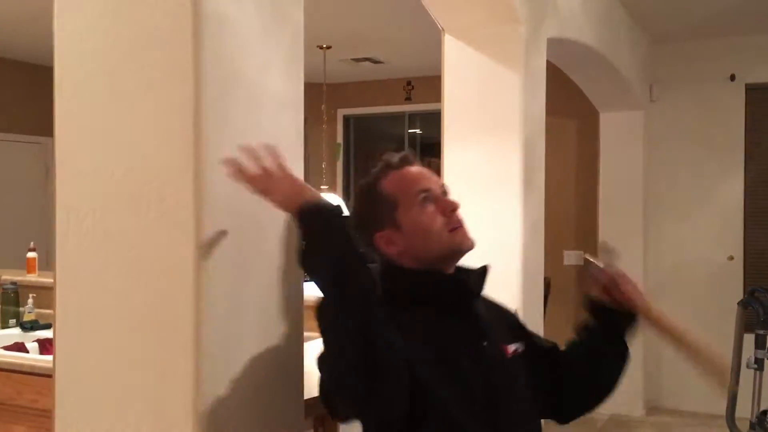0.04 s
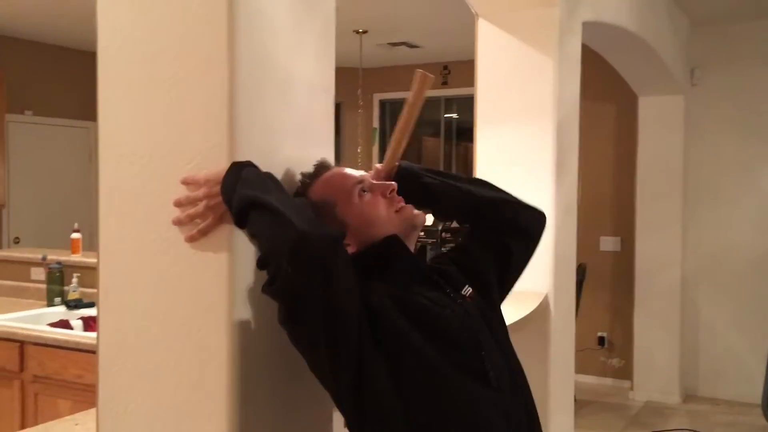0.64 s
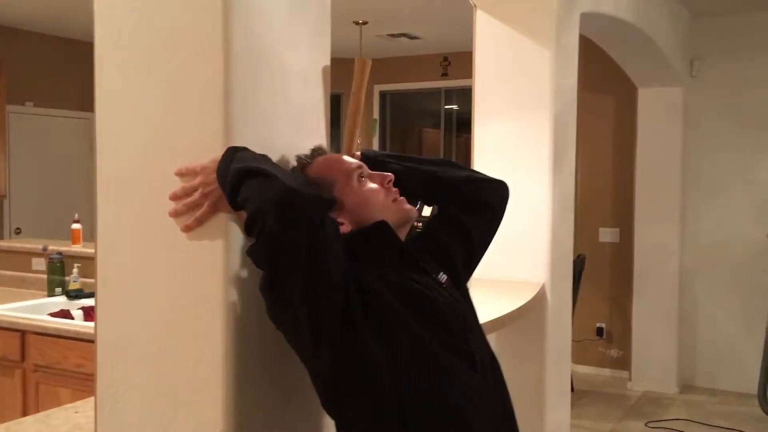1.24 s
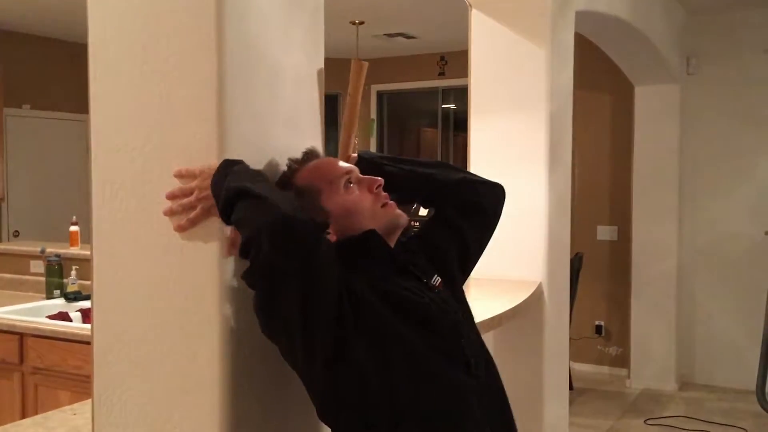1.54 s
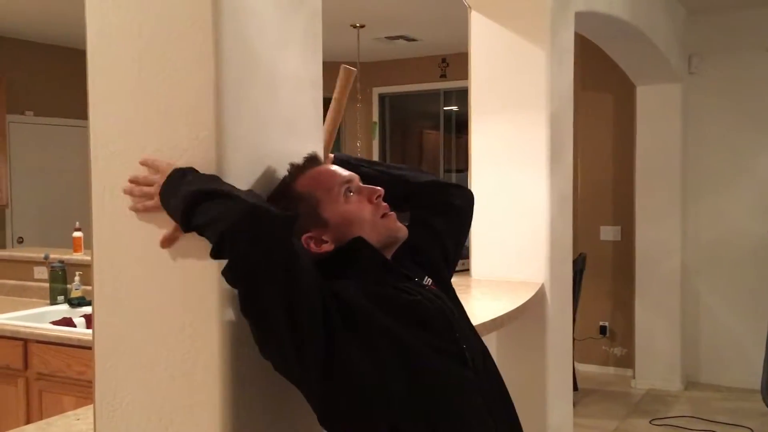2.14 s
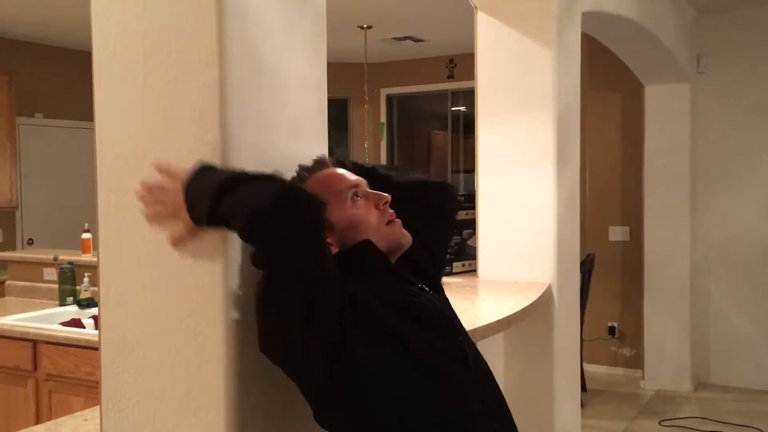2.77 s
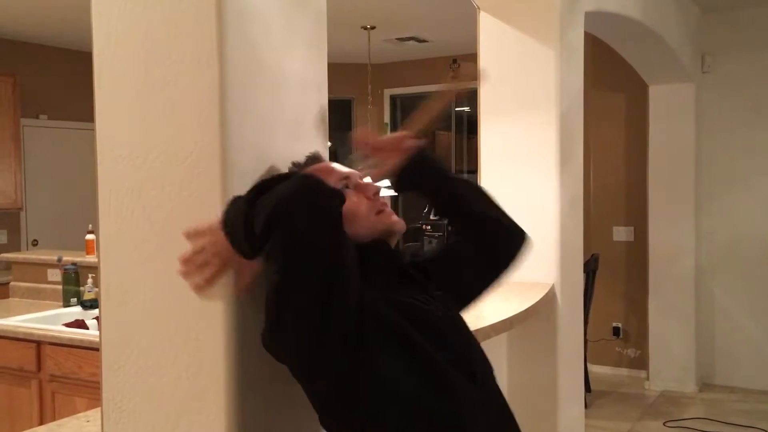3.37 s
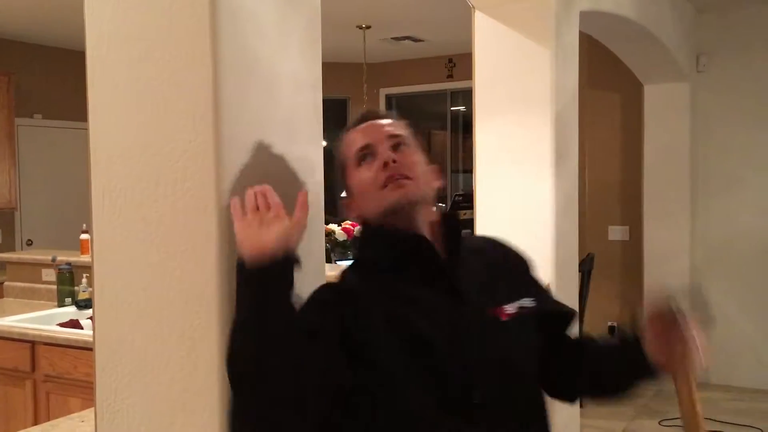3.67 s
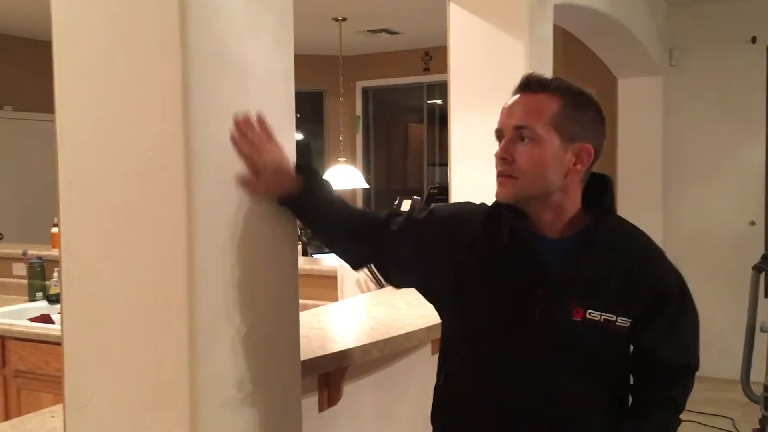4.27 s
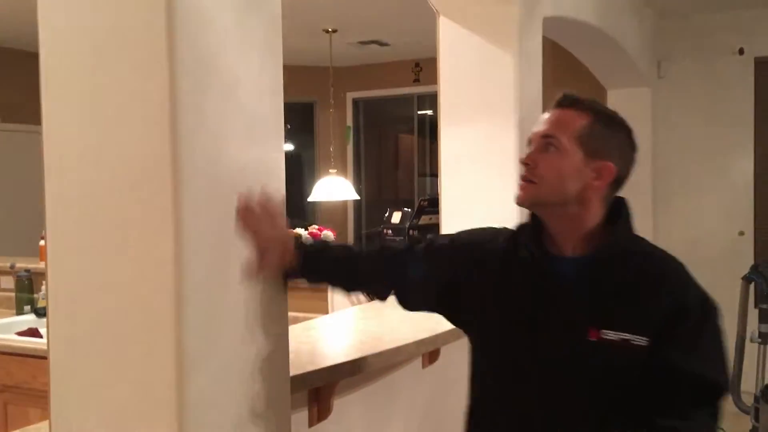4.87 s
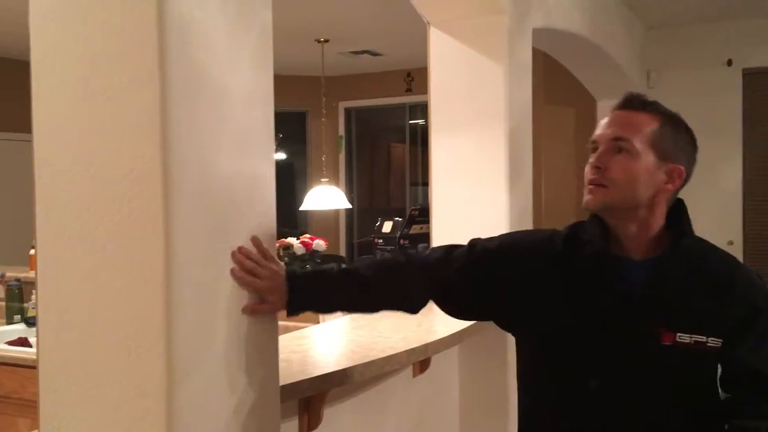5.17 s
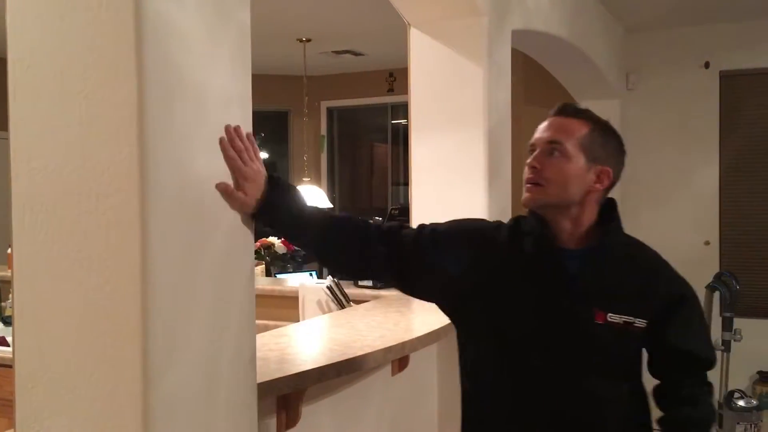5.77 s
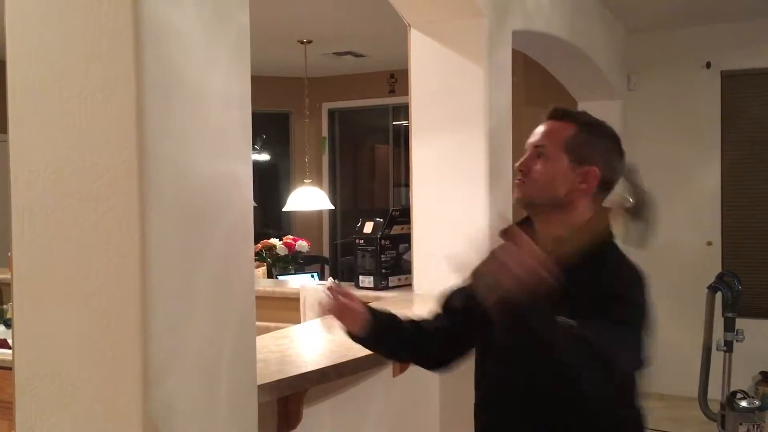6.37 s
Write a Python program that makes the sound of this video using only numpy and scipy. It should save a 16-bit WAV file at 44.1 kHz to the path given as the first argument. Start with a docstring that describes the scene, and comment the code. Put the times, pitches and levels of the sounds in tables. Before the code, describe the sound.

A bare hand slaps a hollow drywall pillar several times, then rubs along it in hissing strokes, over a faint room hum.

```python
"""Slapping and rubbing a hollow pillar

A bare hand slaps a drywall pillar in a hard-floored room, then rubs along it in strokes.
Each slap is a palm-and-fingers smack, a pop of trapped air and a thump that sets the boards ringing.
The sliding skin hisses, rasps and catches. A jacket sleeve rustles; an appliance hums behind it all."""
import sys
import numpy as np
from scipy import signal
from scipy.fft import rfft, irfft, next_fast_len
from scipy.io import wavfile
from scipy.ndimage import map_coordinates

SR = 44100
rng = np.random.default_rng(int(sys.argv[2]) if len(sys.argv) > 2 else 0)


def dump_mix(stems):
    """Bounce the given channels to the path in sys.argv[1] as a 16-bit WAV at rate SR."""
    frames = np.atleast_2d(stems).T  # one column per channel
    limited = np.clip(frames, -1, 1)  # hard clip at full scale
    pcm = np.round(limited * 32767).astype(np.int16)
    wavfile.write(sys.argv[1], SR, pcm)


N = 283122
TIME = np.arange(N) / SR
AGE = TIME[:SR]  # seconds into a transient

# Modes of the boards and the cavity behind them. Each row: frequency in Hz, relative dB, t60 in seconds.
BOARDS = [(67.2, -18, 2.7), (82, -3.5, 1.7), (99.3, -14, 1.7), (133.7, 0, 0.75), (146.1, 4, 0.79),
          (156.1, -3, 0.55), (182, -5.5, 0.99), (205, -4.5, 0.41), (235.2, -3.5, 0.62), (259.4, -3, 0.52),
          (280, -17.5, 1), (310.6, -11, 0.77), (335, -6.5, 0.83), (390, -6, 0.46), (476, -17, 0.28),
          (575.4, -9, 0.28), (571.5, -6, 0.37), (686, -6, 0.37), (737, -1, 0.12), (1038, -27, 0.49),
          (1047, -15, 0.4), (1200, -16, 0.56), (1314, -11, 0.37)]


def amp(db):
    """Decibels to gain."""
    return 10 ** (np.asarray(db) / 20)


def blow(x):
    """Scale a transient to the energy of 10 ms at rms 1."""
    return x * np.sqrt(.01 * SR / (np.sum(x ** 2) + 1e-20))


def fade(t60_s):
    """One second of exponential decay."""
    return np.exp(-np.log(1000) * AGE / t60_s)


def along(points, hz):
    """(Hz, value) points read on a log axis."""
    knots_hz, values = np.transpose(points)
    return np.interp(np.log(hz + 1), np.log(knots_hz + 1), values)


def wobble(rate_hz):
    """Smooth random curve, rate_hz knots a second."""
    return map_coordinates(rng.standard_normal(int(N * rate_hz / SR) + 4), [TIME * rate_hz])


def filtered(x, gain):
    """Apply gain(hz) with zero phase."""
    size = next_fast_len(len(x) + SR // 2)
    return irfft(rfft(x, size) * gain(np.fft.rfftfreq(size, 1 / SR)), size)[:len(x)]


def noise(spectrum):
    """Coloured noise of rms 1."""
    x = filtered(rng.standard_normal(N), lambda hz: amp(along(spectrum, hz)))
    return x / np.sqrt(np.mean(x ** 2) + 1e-20)


def coloured(x, spectrum):
    """Minimum-phase colouring of a one-second transient by (Hz, dB) points."""
    cepstrum = irfft(np.log(amp(along(spectrum, np.fft.rfftfreq(SR, 1 / SR)))))
    cepstrum[1:SR // 2] *= 2
    cepstrum[SR // 2 + 1:] = 0
    return irfft(rfft(x) * np.exp(rfft(cepstrum)))


def ping(hz, t60_s, attack_s):
    """Damped resonance with a soft start."""
    return np.sin(2 * np.pi * hz * AGE) * fade(t60_s) * (1 - np.exp(-AGE / attack_s))


def lingering(power, t60_s):
    """Gain of a sound fed with this power and dying away over t60_s."""
    pole = np.exp(-2 * np.log(1000) / (t60_s * SR))
    return np.sqrt(signal.lfilter([1 - pole], [1, -pole], power))


def add(out, start_s, x):
    """Mix x in at start_s."""
    part = out[round(start_s * SR):][:len(x)]
    part += x[:len(part)]


def room(x, near_gain=0.79, far_s=0.021, early_boost=0.92, early_t60_s=0.062):
    """Reflections off near surfaces, then far walls; a strong early part gives way to a long tail."""
    # Room decay. Each row: frequency in Hz, t60 in seconds.
    decay = [(80, 0.96), (210, 0.79), (560, 0.59), (1470, 0.71), (3800, 0.58), (7000, 0.59), (14000, 0.19)]
    # What the surfaces send back. Each row: frequency in Hz, gain in dB.
    walls = [(60, -1.5), (300, -2.5), (560, -2), (850, -6.5), (1200, -5.5), (2000, -2), (3000, 0.5),
             (4500, -6), (7000, -2), (15000, 5.5)]
    hz, frame_s, bins = signal.stft(rng.standard_normal(SR), SR, nperseg=256)
    bins = bins * np.exp(-np.log(1000) * frame_s / along(decay, hz)[:, None])
    tail = signal.istft(bins, SR, nperseg=256)[1][:SR]
    tail *= np.where(AGE > far_s, 1, near_gain) * (AGE > .005)
    tail *= 1 + early_boost * fade(early_t60_s)
    return signal.fftconvolve(x, coloured(tail / np.linalg.norm(tail), walls))[:SR]


def appliance_hum():
    """Low tones, slightly unsteady in level and phase."""
    # Hum partials. Each row: frequency in Hz, rms level in dB.
    partials = [(59.2, -54), (119.5, -58.5), (398.4, -76), (597.8, -63.5)]
    out = np.zeros(N)
    for hz, db in partials:
        peak = np.sqrt(2) * amp(db + 0.13 * wobble(4.5))
        out += peak * np.sin(2 * np.pi * hz * TIME + 0.057 * wobble(5.7))
    return out


def room_air():
    """Low, steady rush of air."""
    # Air spectrum. Each row: frequency in Hz, relative density in dB.
    spectrum = [(20, -48), (35, -7.5), (58, 7.5), (85, -10), (125, -6), (190, -10), (280, -18.5),
                (450, -28), (900, -32), (1650, -41), (2300, -85), (6000, -63), (16000, -57)]
    return amp(-51) * noise(spectrum)


def sleeve(hiss_gain, drag_db=-13.5, rest_db=-66.5):
    """Cloth brushes unevenly on cloth, swelling with each arm swing and dragging along with the palm."""
    # Arm swings. Each row: middle in seconds, width in seconds, level in dB.
    swings = [(0.2, 0.48, -56.5), (0.328, 0.098, -48), (1.004, 0.38, -55.5), (2.925, 0.38, -47),
              (3.553, 0.4, -58), (4.314, 0.68, -55.5), (5.157, 0.19, -55.5), (6.01, 0.25, -53.5),
              (6.264, 0.35, -51.5)]
    # Cloth spectrum. Each row: frequency in Hz, relative density in dB.
    cloth = [(200, 5.5), (700, -1.5), (1100, 1), (1650, 3), (2500, -2.5), (4000, -7), (6000, -10),
             (16000, -16)]
    swing_power = sum((amp(db) * np.exp(-2 * ((TIME - middle_s) / width_s) ** 2)) ** 2
                      for middle_s, width_s, db in swings)
    gain = np.sqrt(swing_power + (amp(drag_db) * hiss_gain) ** 2 + amp(rest_db) ** 2)
    return gain * noise(cloth) * amp(-2.5 + 0.75 * wobble(35) + 1.6 * wobble(300))


def ticks():
    """Light, hard touches that ring briefly."""
    # Touches. Each row: start in seconds, level in dB, pitch in Hz.
    touches = [(0.131, -63, 1740), (6.108, -46.5, 2560), (6.122, -50.5, 1940)]
    # Tick partials. Each row: multiple of the pitch, relative level in dB.
    partials = [(.6, -11), (1, -1), (1.42, -6), (1.75, -8)]
    out = np.zeros(N)
    for start_s, level_db, hz in touches:
        ring = sum(amp(db) * ping(ratio * hz, t60_s=0.065, attack_s=0.0011) for ratio, db in partials)
        tick = amp(level_db) * blow(ring)
        add(out, start_s, tick + amp(-4) * room(tick))
    return out


def friction(speed_exponent=0.55):
    """Gains of hiss, rasp and murmur follow the hand as it speeds up and slows in each stroke."""
    # Palm strokes. Each row: start and end in seconds, share of the stroke before top speed,
    # hiss in dB, rasp in dB over the hiss, wall murmur in dB.
    strokes = [(0.0, 0.776, .35, -65, -14, -62.5), (0.25, 0.422, .45, -65, -8, -54),
               (0.755, 1.12, 0.66, -60.5, -8, -57), (1.17, 1.294, 0.65, -66, -8, -61),
               (1.70, 1.82, .5, -67.5, -12, -74), (2.213, 2.68, 1, -60.5, -2, -63),
               (2.676, 2.753, 0.38, -53.5, 0, -41.5), (2.774, 2.903, 0.36, -48, -9, -42.5),
               (2.96, 3.062, .4, -48, -7, -31), (3.13, 3.448, 0.1, -51, -10, -59),
               (3.432, 3.62, 0.21, -51, -11, -71), (4.064, 4.24, .35, -51, -6.5, -77),
               (4.285, 4.428, 0.65, -52, -10.5, -62.5), (4.465, 4.595, 0.28, -50, -13, -64),
               (4.598, 4.832, 0.53, -48.5, -10, -53), (4.858, 5.05, 0.4, -47, -12.5, -52.5),
               (5.092, 5.221, 0.22, -45.5, -5, -55), (5.295, 5.438, 0.55, -51, -19, -52.5),
               (5.474, 5.608, 0.17, -44.5, -10, -48), (5.653, 5.842, 0.41, -49, -7, -51),
               (5.85, 6.36, 0.23, -52.5, -12, -79)]
    hiss, rasp, murmur = np.zeros((3, N))
    for start_s, end_s, crest, hiss_db, rasp_db, murmur_db in strokes:
        fastest_s = start_s + np.clip(crest, .1, .9) * (end_s - start_s)
        speed = np.sin(np.pi * np.interp(TIME, [start_s, fastest_s, end_s], [0, .5, 1]))
        power = np.abs(speed) ** (2 * speed_exponent)
        hiss += amp(hiss_db) ** 2 * power
        rasp += amp(hiss_db + rasp_db) ** 2 * power
        murmur += amp(murmur_db) ** 2 * power
    return lingering(hiss, t60_s=0.3), lingering(rasp, t60_s=0.3), lingering(murmur, t60_s=0.66)


def rubbing(hiss_gain, rasp_gain, murmur_gain, creep_db=-73):
    """Skin hisses over textured paint and rasps where it grips; the bumps make the hollow wall murmur."""
    # Spectra of sliding skin, gripping skin and the wall. Each row: frequency in Hz, relative dB.
    sliding = [(500, -14), (1500, -3), (2400, -5), (3300, 2), (4300, 0.5), (5100, -2), (6800, 1),
               (8300, -2), (10200, -0.5), (11500, 1.5), (15000, -0.5), (16000, -4)]
    gripping = [(2000, -17), (3200, 2), (3800, 3.5), (4400, 2.5), (5500, -39)]
    wall = [(40, -20), (80, -17), (130, -2), (210, 3), (290, 1.5), (370, -8.5), (550, -19.5), (900, -14),
            (2000, -59)]
    hiss = noise(sliding) * amp(1.9 + 1.26 * wobble(45) + 0.35 * wobble(700))
    rasp = noise(gripping) * amp(2 * wobble(150))
    murmur = noise(wall) * amp(3.15 * wobble(22))
    slide_gain = np.hypot(hiss_gain, amp(creep_db))  # the palm creeps between strokes
    return slide_gain * hiss + rasp_gain * rasp + murmur_gain * murmur


def board_modes():
    """Each mode of the wall ringing on its own, one a row."""
    return np.array([amp(db) * ping(hz, t60_s, attack_s=0.007) for hz, db, t60_s in BOARDS])


def boards(modes, drive_hz, reach_octaves):
    """Modes ring at random strengths, most near the drive; the first swings ring stronger, then settle into a
    longer decay."""
    strengths = amp(rng.normal(0, 2, len(modes))) * rng.choice([-1, 1], len(modes))
    octaves = np.log2(np.transpose(BOARDS)[0] / drive_hz)
    nearness = 1 / (1 + (octaves / reach_octaves) ** 2) ** 2
    ring = (strengths * nearness) @ modes
    ring *= 1 + 0.79 * fade(t60_s=0.13)
    return ring / np.std(ring[:SR // 10])


def thump(thump_hz, room_db):
    """The heavy board gives way under the hand and booms into the room."""
    # A soft blow, weak above its own pitch. Each row: multiple of thump_hz, relative level in dB.
    shape = [(.05, -13), (.15, -26), (.3, -3), (.55, -1), (1, 1.5), (1.35, -3), (1.9, -17), (5, -57),
             (20, -68)]
    spectrum = [(ratio * thump_hz, db) for ratio, db in shape]
    push = blow(coloured(signal.unit_impulse(SR), spectrum))
    return push + amp(room_db) * room(push)


def contact(spectrum, land_s, room_db):
    """Palm and fingers land one by one over about land_s; the room answers with the same colour."""
    click = coloured(signal.unit_impulse(SR), spectrum)
    gap_s = .0024 * rng.uniform(0.512, 2)  # two main pads land apart, giving a hollow tint
    click = blow(click + 0.22 * np.interp(AGE - gap_s, AGE, click, left=0))
    pads = np.exp(0.98 * np.interp(AGE, np.arange(40) * .0007, rng.standard_normal(40)))
    envelope = np.exp(-(AGE / land_s) ** 2) * (1 - np.exp(-AGE / 0.000062))
    landing = envelope * pads * rng.standard_normal(SR)
    return blow(coloured(landing, spectrum)) + amp(room_db) * room(click)


def judders(modes):
    """The shifting hand catches and slips on the wall: a dull thump and a scuff."""
    # Catches. Each row: start in seconds, thump in dB, thump pitch in Hz, scuff in dB.
    catches = [(.405, -45.5, 193, -73), (2.747, -31.5, 94.4, -60), (2.784, -33.5, 89.8, -47.5),
               (2.842, -36, 118, -46), (2.878, -34.5, 155, -41), (2.912, -32, 188, -43),
               (3.06, -38, 93, -51), (5.283, -46.5, 270, -69), (5.735, -43.5, 215, -75)]
    scuff_hz_db = [(300, -13), (550, 6), (780, 4), (1000, -2), (1200, 7.5), (2500, -56), (16000, -31)]
    out = np.zeros(N)
    for start_s, thump_db, thump_hz, scuff_db in catches:
        scuff = contact(scuff_hz_db, land_s=0.05, room_db=4.0)
        body = thump(thump_hz, room_db=-5.5) + amp(-10.5) * boards(modes, thump_hz, reach_octaves=0.79)
        add(out, start_s, amp(thump_db) * body + amp(scuff_db) * scuff)
    return out


def smack_spectrum(smack_hz, lift_db=6, width_octaves=0.41):
    """The smack's colour, lifted around a pitch: a flatter hand sounds higher."""
    # Hand on paint. Each row: frequency in Hz, relative density in dB.
    base = [(200, -21), (450, 14.5), (690, 9.5), (850, 7.5), (1250, 7), (1750, 4.5), (2500, -4), (3500, -2),
            (4400, -4), (5000, -8.5), (6300, -6), (8000, -22.5), (16000, -27)]
    hz = np.geomspace(100, 16000, num=60)
    bump = np.exp(-(np.log2(hz / smack_hz) / width_octaves) ** 2)
    return np.column_stack([hz, along(base, hz) + lift_db * bump])


def slaps(modes, pop_t60_cycles=13.4):
    """Each blow smacks the paint, pops the air under the palm and, a moment later, pushes the board in."""
    # Blows. Each row: start in seconds, thump in dB and Hz, ring in dB, air pop in dB and Hz,
    # smack in dB and Hz, skin snap in dB, the smack's room send in dB.
    blows = [(0.8411, -24.5, 266, -34, -40, 1280, -32, 3150, -61, -0.5),
             (1.8466, -24.5, 199, -26, -22.5, 563, -22.5, 700, -36, -3),
             (2.1424, -21.5, 189, -26, -31, 532, -26.5, 1520, -37, -6),
             (2.3262, -21.5, 268, -35.5, -22.5, 1074, -26, 2780, -48, 0),
             (2.4294, -25.5, 170, -28.5, -40.5, 1285, -32.5, 3520, -43.5, -6.5),
             (2.6105, -27, 236, -36, -32.5, 1084, -26, 4130, -46.5, 2.5),
             (3.206, -32, 282, -32.5, -26.5, 1114, -32.5, 2500, -57, 2),
             (4.0780, -38, 322, -53, -46, 1344, -43.5, 950, -48, 3),
             (4.0895, -36, 290, -65, -24.5, 292, -56, 1400, -46, -12)]
    # Skin snap spectrum. Each row: frequency in Hz, relative density in dB.
    snap_spectrum = [(3000, -16), (7000, -10.5), (10000, -6), (16000, -10.5)]
    out = np.zeros(N)
    for start_s, thump_db, thump_hz, ring_db, pop_db, pop_hz, smack_db, smack_hz, snap_db, room_db in blows:
        smack = amp(smack_db) * contact(smack_spectrum(smack_hz), land_s=0.0059, room_db=room_db)
        snap = amp(snap_db) * contact(snap_spectrum, land_s=0.0057, room_db=1.1 * room_db - 4)
        pop = amp(pop_db) * blow(ping(pop_hz, pop_t60_cycles / pop_hz, attack_s=0.0017))
        hollow = amp(pop_db - 19.5) * boards(modes, pop_hz, reach_octaves=0.92)  # woken by the pop
        add(out, start_s, smack + snap + pop + hollow + amp(room_db - 3.0) * room(pop))
        boom = amp(thump_db) * thump(thump_hz, room_db=1.5 + 0.13 * room_db)
        ring = amp(ring_db) * boards(modes, thump_hz, reach_octaves=2.5)
        add(out, start_s + .0015, boom + ring)
    return out


def scene():
    """All sources in mono, from a few steps away."""
    modes = board_modes()
    hiss_gain, rasp_gain, murmur_gain = friction()
    hand = slaps(modes) + judders(modes) + ticks() + rubbing(hiss_gain, rasp_gain, murmur_gain)
    return (hand + sleeve(hiss_gain) + appliance_hum() + room_air())[None]


def record(dry):
    """Brick-wall low-pass."""
    top_hz = 15950
    return filtered(dry[0], lambda hz: hz < top_hz)[None]


dry = scene()
out = record(dry)
dump_mix(out)
```